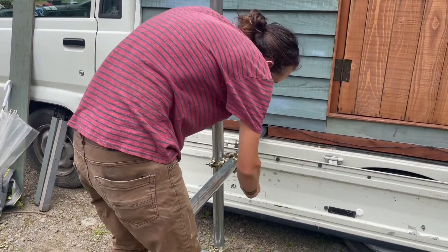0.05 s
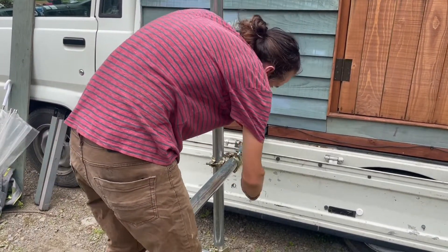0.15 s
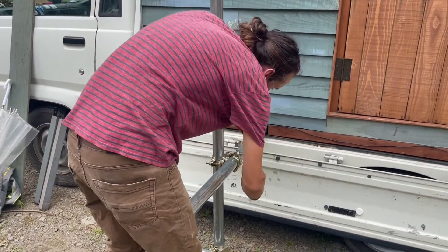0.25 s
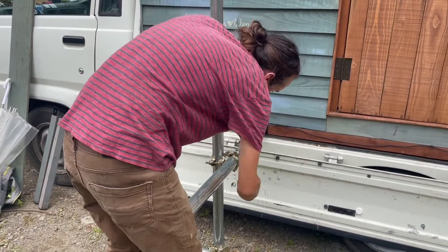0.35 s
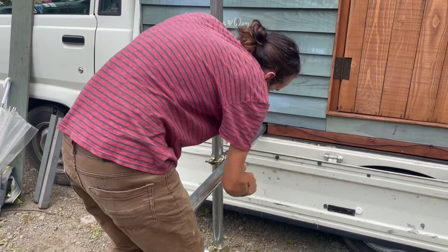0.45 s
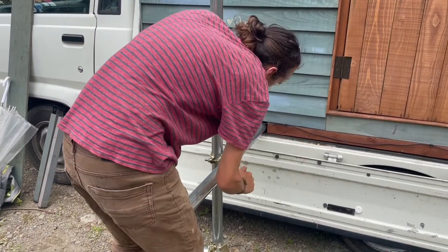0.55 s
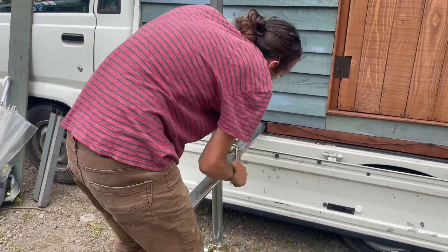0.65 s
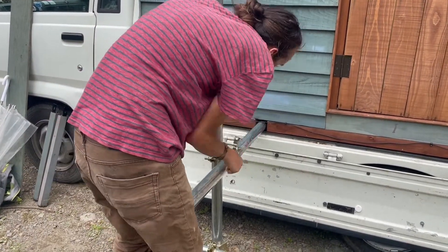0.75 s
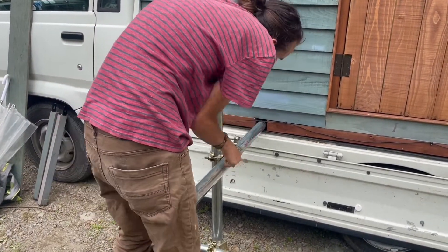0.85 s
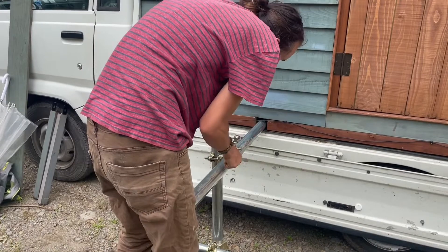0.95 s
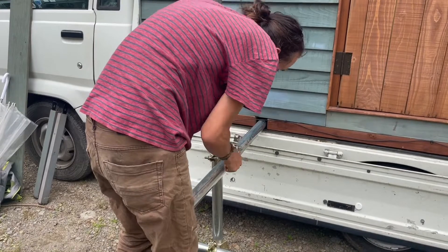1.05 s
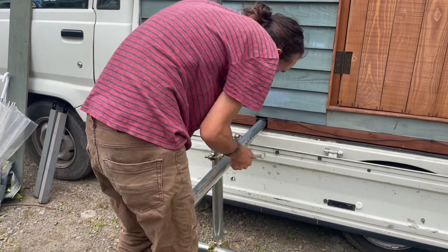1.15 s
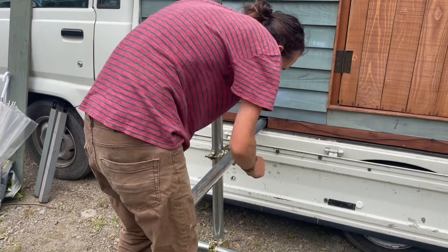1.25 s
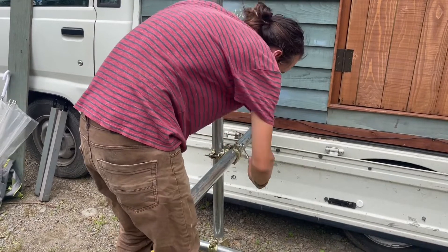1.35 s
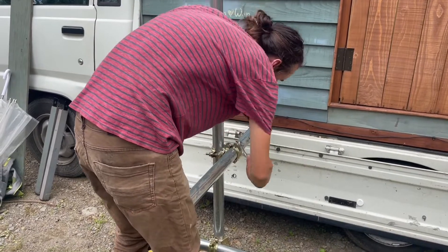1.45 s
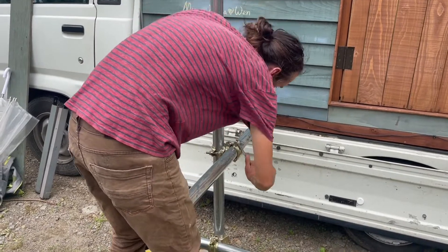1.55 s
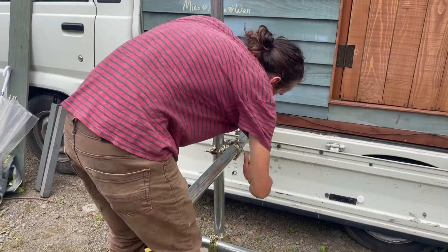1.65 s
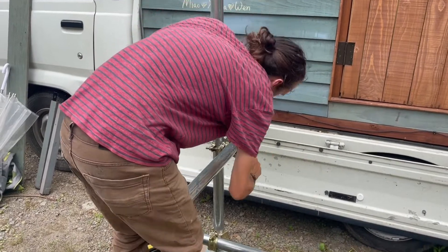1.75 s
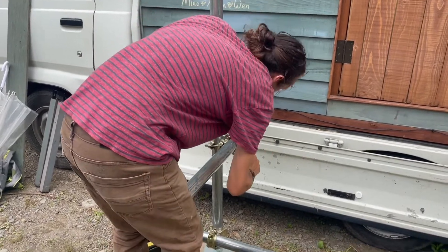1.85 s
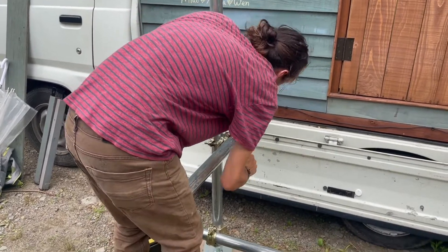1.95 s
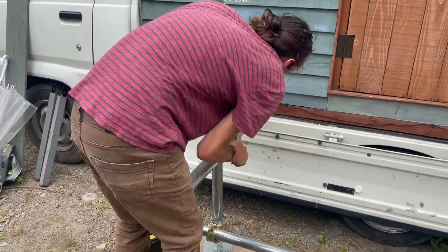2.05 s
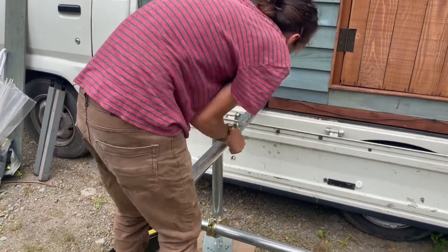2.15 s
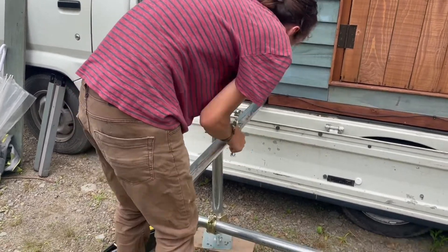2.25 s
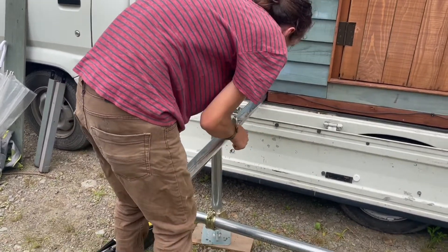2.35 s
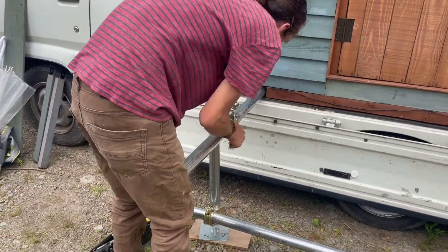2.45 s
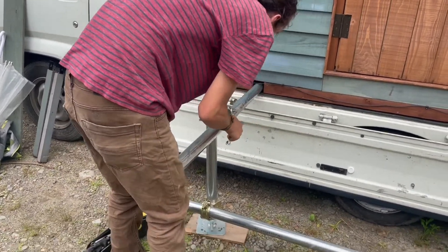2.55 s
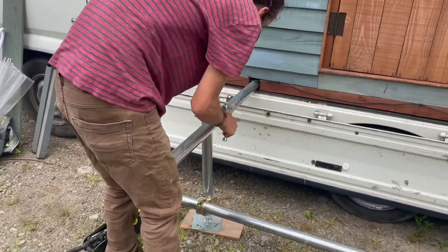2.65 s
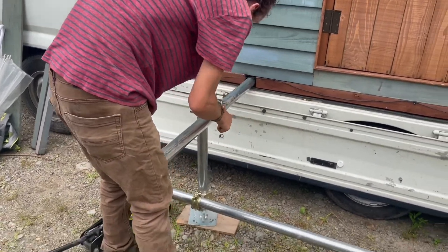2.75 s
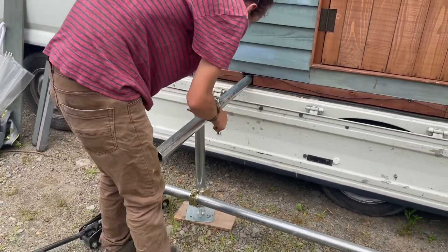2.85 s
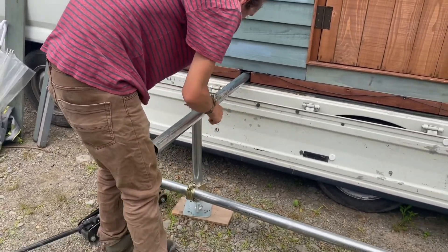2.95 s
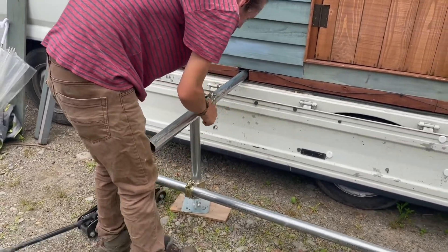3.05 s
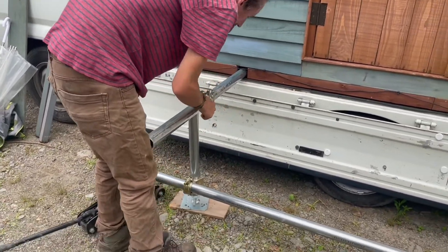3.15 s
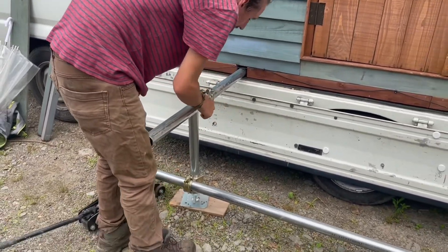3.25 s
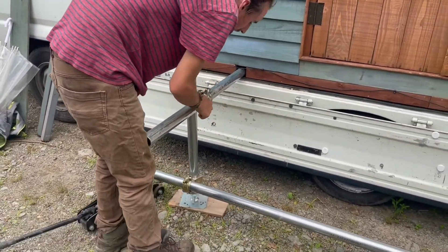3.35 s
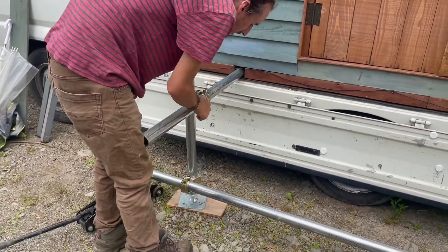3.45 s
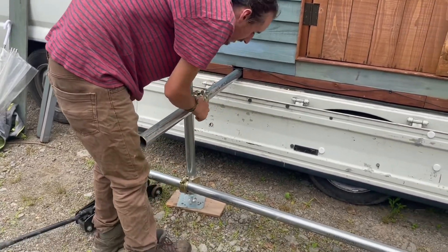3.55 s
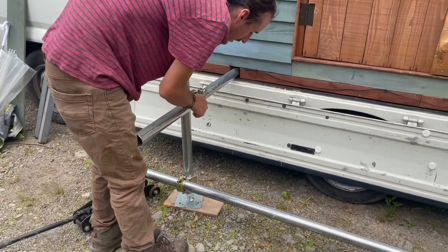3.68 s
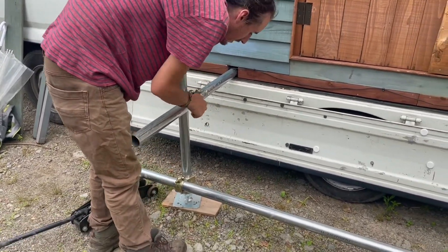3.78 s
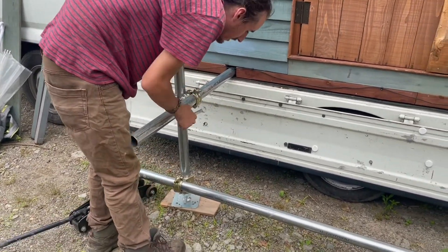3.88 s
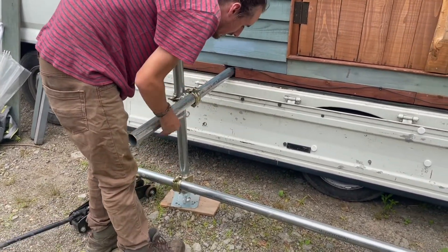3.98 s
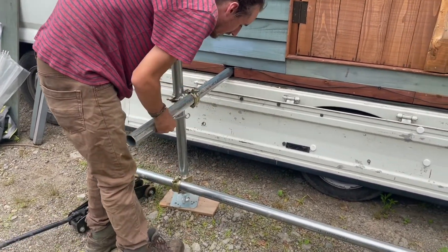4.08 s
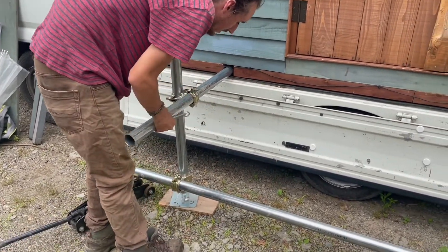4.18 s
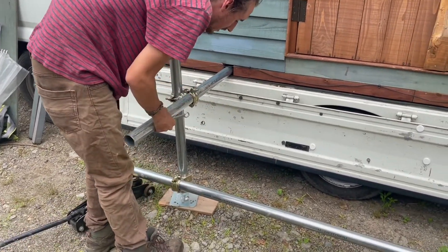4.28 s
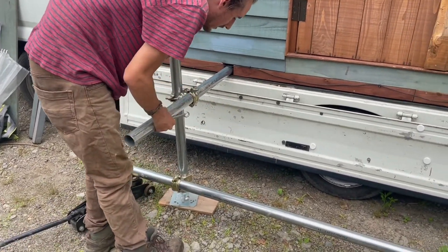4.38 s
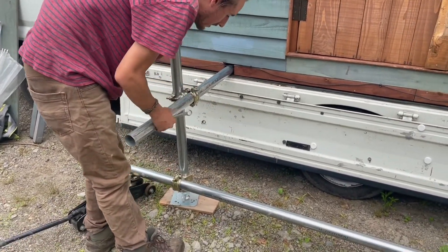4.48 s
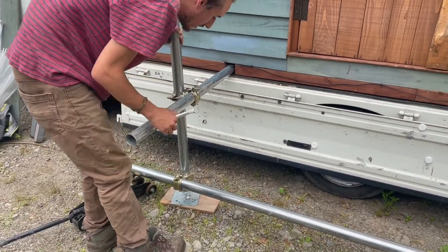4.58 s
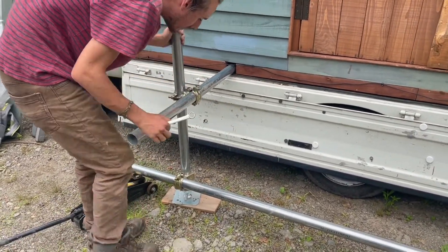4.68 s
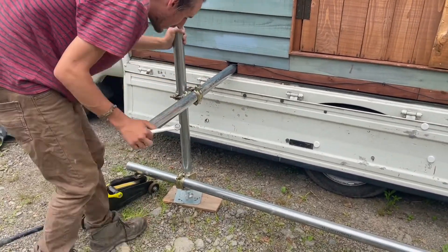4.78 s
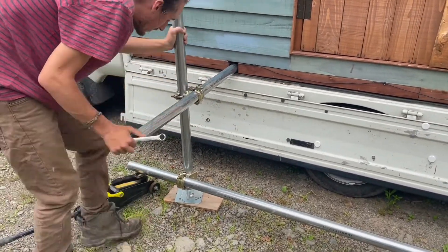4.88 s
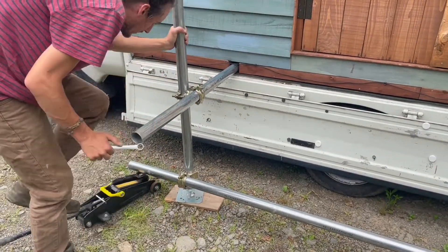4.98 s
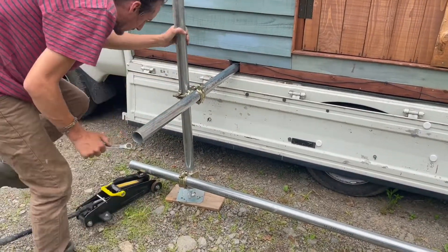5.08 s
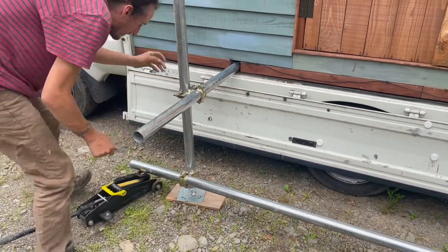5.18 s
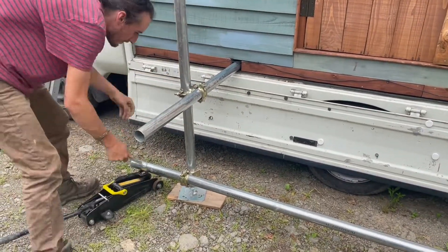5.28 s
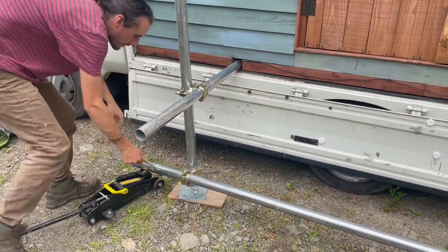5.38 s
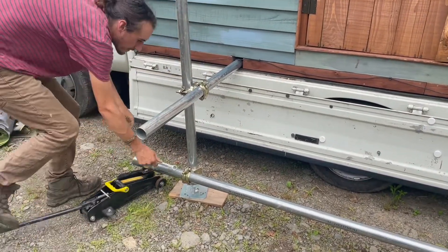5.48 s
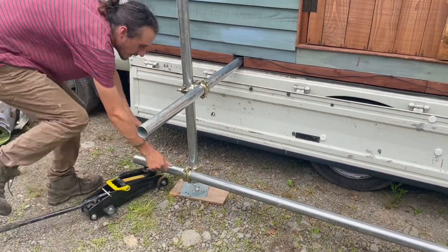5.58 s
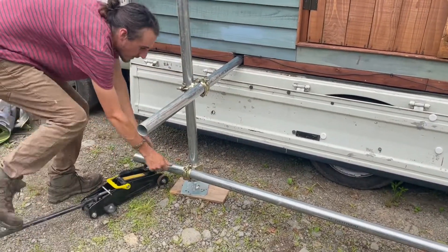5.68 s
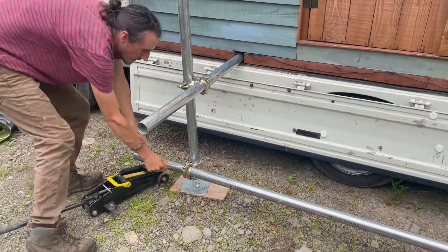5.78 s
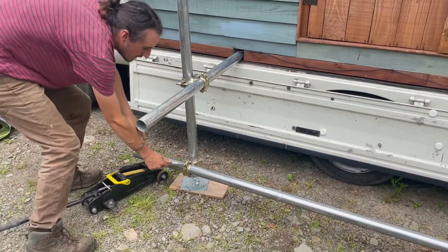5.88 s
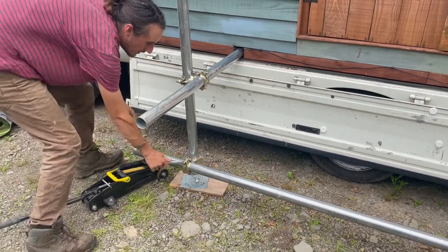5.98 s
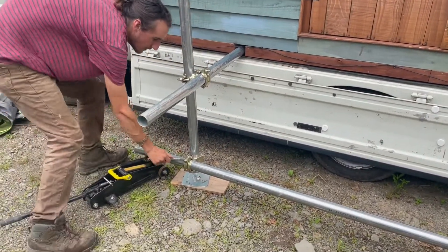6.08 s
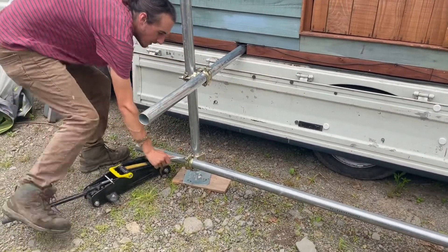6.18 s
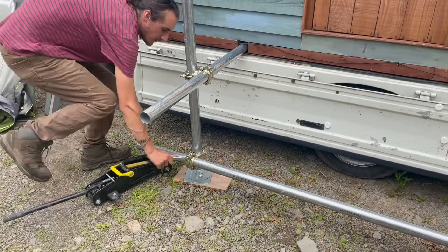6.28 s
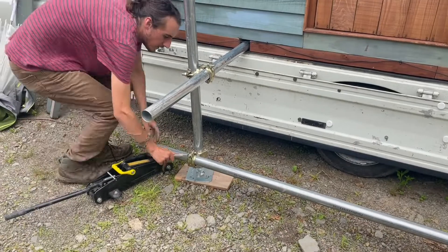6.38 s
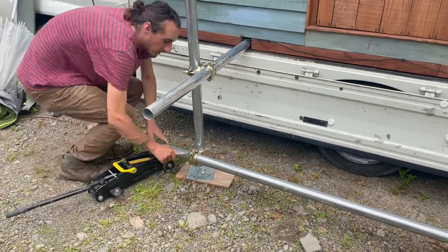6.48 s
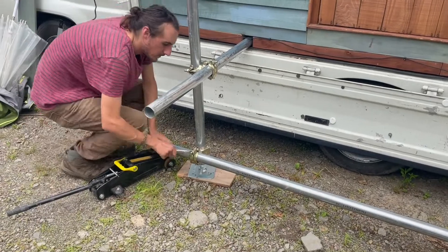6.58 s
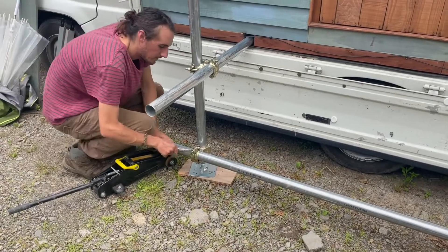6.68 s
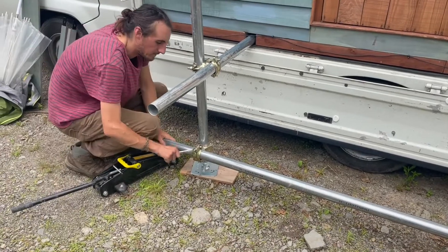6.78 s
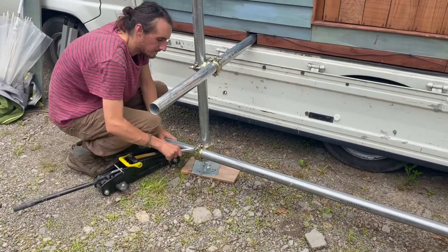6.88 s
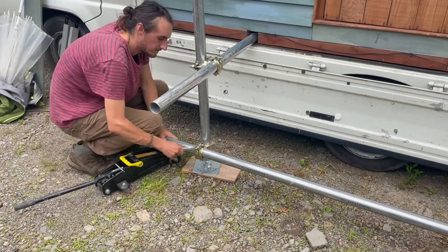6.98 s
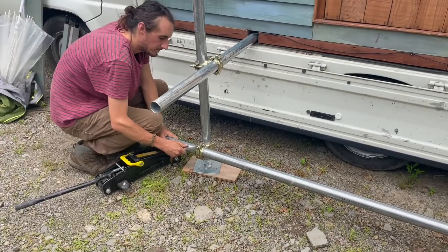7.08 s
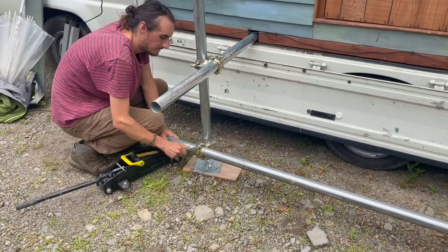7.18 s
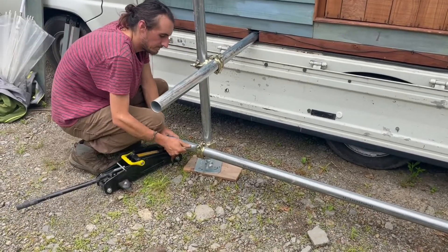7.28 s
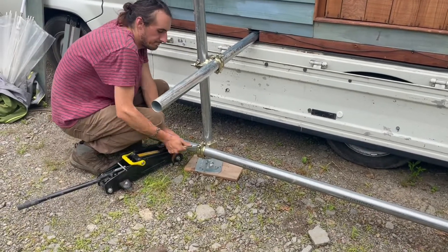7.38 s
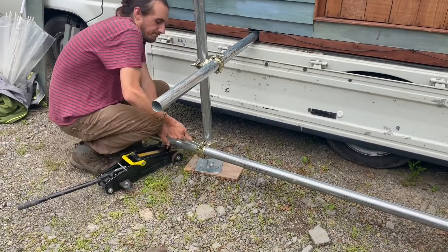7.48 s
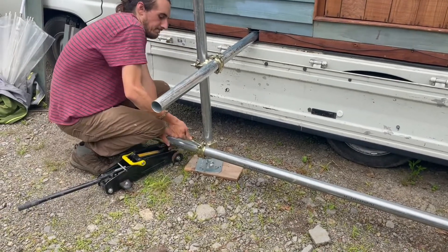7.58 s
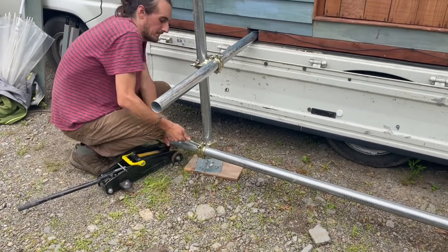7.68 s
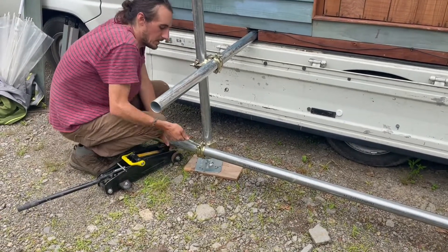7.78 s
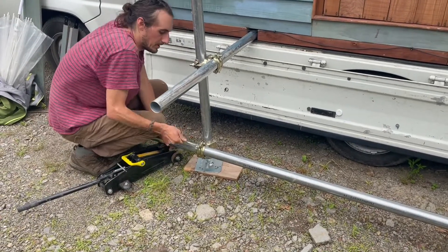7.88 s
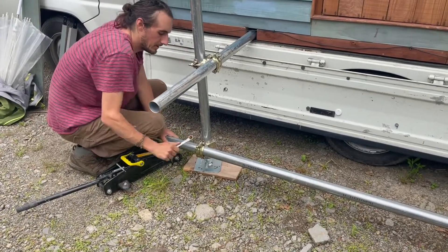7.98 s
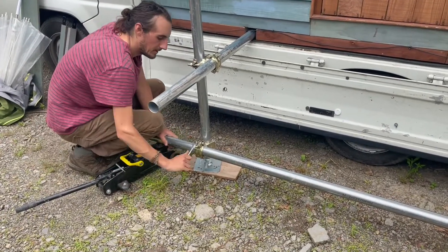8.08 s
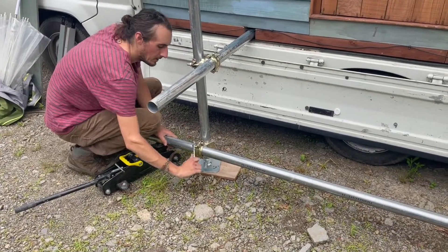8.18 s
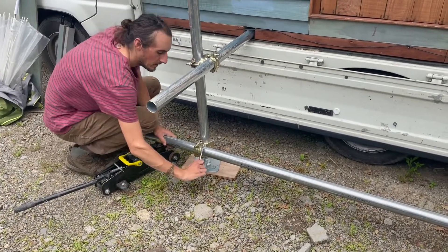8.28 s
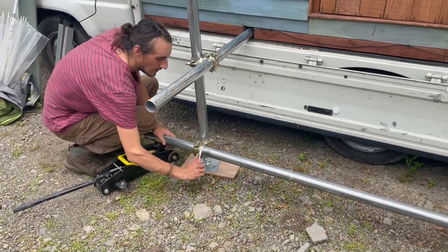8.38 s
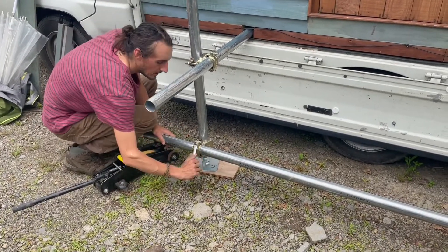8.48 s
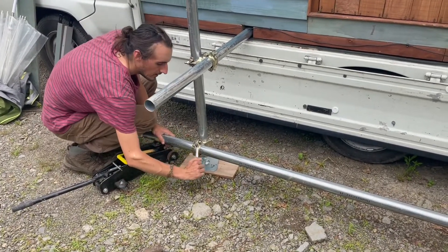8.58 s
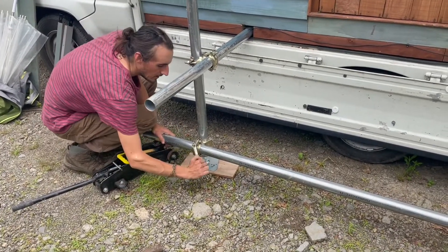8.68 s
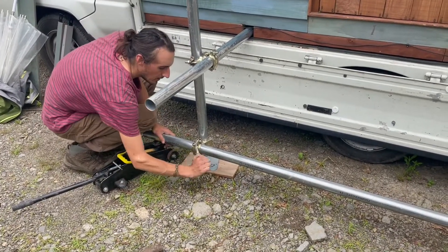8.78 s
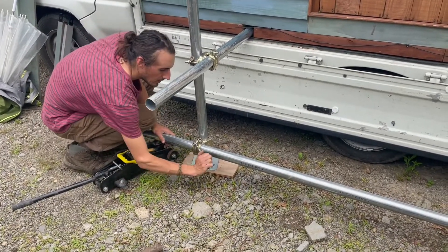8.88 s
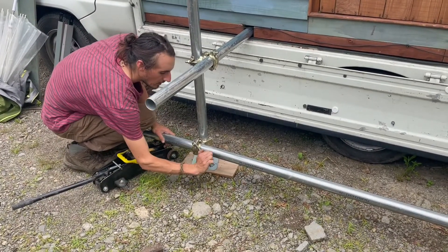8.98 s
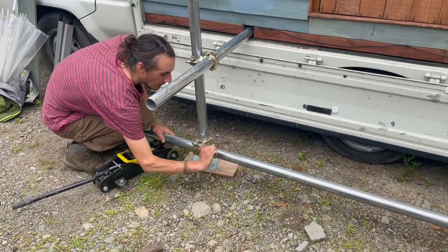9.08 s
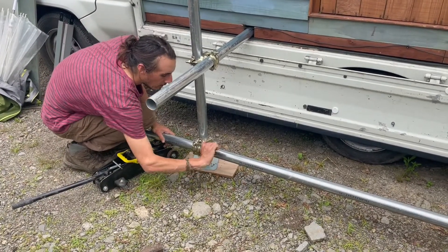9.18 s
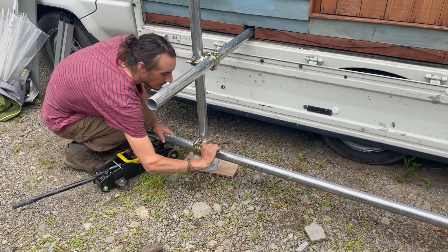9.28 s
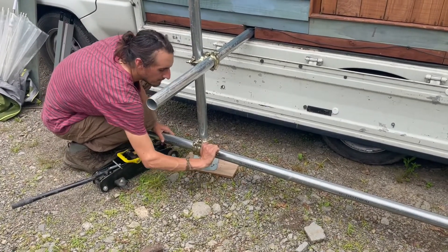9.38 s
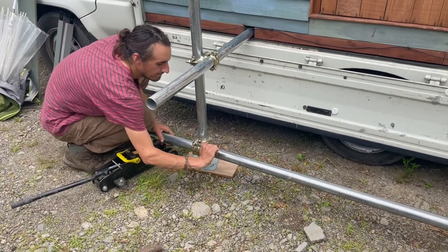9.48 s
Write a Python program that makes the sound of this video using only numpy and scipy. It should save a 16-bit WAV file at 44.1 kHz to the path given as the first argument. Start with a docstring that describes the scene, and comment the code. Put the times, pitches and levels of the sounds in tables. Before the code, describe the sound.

In an open gravel yard, close to a small stereo microphone, a steel spanner works on a scaffold clamp. A light clink comes at 0.2 s, with three thin, falling bird chirps between 0.2 and 0.7 s and a faint distant whistle. Dull taps and a soft rub begin around 0.9 s, then a brighter rattle of clanks at 1.3 to 1.6 s. From 2 to 4.5 s it is quiet: faint ticks, slight sliding, soft low footfalls, cloth rustle, another far whistle near 2.7 s. Gravel crunches from 4.6 s, thickening at 5.2 to 6.1 s with a dragged pipe foot and thuds. A sharp loud clank strikes at 5.5 s, then smaller knocks. A deep thud lands at 6.8 s, a hard click at 7.0. Crisp, ringing knocks cluster from 7.9 to 9.1 s, then fade to quiet air and a faint chirp at 9.5 s.

```python
"""Scaffold clamps and gravel

A man tightens two scaffold clamps with a steel spanner in a gravel yard, a high joint and then a low one.
Knocks and slips are noise bursts through each clamp's resonances; the pipes ring as decaying modes.
Boots and pipe feet crunch, and a pipe foot drags, as trains of tiny impacts over low thuds and rustling cloth.
Far bird calls and whistles, and a faint pipe-like ring, are sine tones with a diffuse echo, over air noise."""
import sys
import numpy as np
from scipy import signal
from scipy.fft import rfft, irfft, next_fast_len
from scipy.io import wavfile

SR = 44100
rng = np.random.default_rng(int(sys.argv[2]) if len(sys.argv) > 2 else 0)


def wav_out(sig):
    """Save sig, one row per channel (or a flat mono array), as 16-bit PCM at SR to the path in sys.argv[1]."""
    wavfile.write(sys.argv[1], SR, np.round(np.clip(np.atleast_2d(sig).T, -1, 1) * 32767).astype(np.int16))


N = 420694

# Spanner contacts on each clamp: start_s, relative level_db, body_db (under about 3 kHz), treble_db, chatter_s
HIGH_BLOWS = [(0.001, -42.5, -6, -1, .005), (0.038, -46, 2, -24, .015), (0.18, -31, -5, 5.5, .014),
              (0.897, -50.5, 16, -4.5, .008), (1.034, -53.5, 15, -9, .007), (1.094, -47, -0.5, -2, .009),
              (1.325, -37, -13, 11.5, .011), (1.408, -28, -16.5, 4, .02), (1.436, -34.5, -1.5, -9, .017),
              (1.518, -38.5, 1.5, -2.5, .009), (1.618, -46.5, -4, 5, .008), (2.234, -49, 6, -8, .005),
              (2.702, -62, 4, -11, 0.0093), (2.884, -59, 5, -21, .009), (3.04, -54.5, 12.5, -22, .005),
              (3.09, -64.5, 4, -24, .01), (3.275, -58, 4.5, 4.5, .021), (5.07, -60.5, -15, 9, .03)]
LOW_BLOWS = [(5.52, -21.5, -13.5, -3, 0.0063), (5.659, -32.5, -6, -14.5, .002),
             (5.717, -41.5, -7, 0, 0.0056), (5.758, -37.5, -1.5, 4.5, 0.0087),
             (5.817, -38.5, 1.5, 2.5, .005), (5.865, -35.5, 2, -0.5, .013), (6.168, -36.5, 0, -6.5, .002),
             (6.225, -35, 7, -6, .015), (6.34, -49.5, 14, -4, 0.014), (6.619, -44, 5, 1, .006),
             (6.771, -37, 7.5, -4.5, .003), (6.965, -28, 4, -0.5, 0.00077), (7.105, -34, 3.5, -1, .003),
             (7.852, -37, -1, -1.5, 0.0033), (7.859, -23, 0, 1, 0.0011), (8.1, -29, -5.5, -4, .001),
             (8.198, -32.5, -1, -4, 0.044), (8.256, -32.5, -10, -7.5, .012), (8.276, -22, -11, 3, .002),
             (8.466, -23.5, 0, -1, .002), (8.612, -35.5, 1, -5, 0.035), (8.702, -43, 6.5, -6.5, .003),
             (8.736, -39, 1, 5, 0.015), (8.759, -38.5, -3.5, 9, .008), (8.8, -41.5, 6.5, -4, .005),
             (8.905, -25, 3, -4.5, 0.0062), (9.082, -40.5, 6.5, -8, .012), (9.113, -35, 6.5, -8, 0.0087)]
# Spectra of the clamps' dense, short-lived resonances: frequency_hz, density_db (per Hz)
HIGH_CLAMP_SPECTRUM = [(150, -5), (330, -1), (480, 0), (1150, -8), (1500, 2), (2400, -3), (2950, 4),
                       (3600, -5), (4200, 4.5), (8300, 1), (9900, -7.5), (11000, 1), (13000, -6),
                       (16000, -27)]
LOW_CLAMP_SPECTRUM = [(300, -8), (1000, -20), (1260, -6), (1650, -9), (2130, -3), (2520, -9), (2900, -1.5),
                      (3450, -7.5), (3950, -3.5), (5300, -1), (7300, -2.5), (10300, -4), (12300, -3),
                      (16000, -19.5)]
# Lasting modes of each joint with its pipes: frequency_hz, relative level_db, t60_s
HIGH_MODES = [(480.6, -13.5, 0.21), (947, -18.5, 0.25), (1452, -16, 0.17), (1830, -30, 0.21),
              (2862, -25.5, 0.92), (3085, -25, 0.29), (3445, -8, 0.1), (3825, -24.5, 1.67),
              (3875, -20.5, 1.1), (3940, -17.5, 0.92), (4210, -21.5, 0.73), (4410, -16, 0.35),
              (5290, -9, 0.13), (4870, -16, 0.24), (6180, -25, 0.11), (6900, -17.5, 0.18),
              (8690, -8, 0.088), (8500, -24, 0.15), (11060, -12.5, 0.23), (11600, -19, 0.13)]
LOW_MODES = [(1254, -23, .2), (2060, -17.5, .12), (2140, -17, 0.082), (2865, -10, .32), (3035, -15, .26),
             (3859, -17, 1.0), (3943, -15, .9), (4038, -18, .85), (4185, -14, .6), (4347, -12.5, .42),
             (4502, -15.5, .35), (4700, -21, .3), (5085, -15, .15), (5439, -13, .18), (6536, -13, .17),
             (6854, -10, .2), (7055, -17, .18), (7316, -13, .15), (7734, -15, .15), (8065, -12, .16),
             (8228, -16, .15), (9216, -17, .15), (10930, -18, .15), (11940, -20, .13)]
# Spanner sliding round the high nut: start_s, length_s, level_db
RUB_EVENTS = [(1.036, 0.25, -54), (2.312, .25, -53), (4.205, 0.11, -59.5)]
# Broad clamp resonances heard in the sliding: frequency_hz, half_width_hz, relative level_db
RUB_BANDS = [(630, 120, 0), (1460, 110, 1), (3150, 300, -1.5), (4320, 200, -4.5)]
# Boots and pipe feet on gravel, with light ticks and scrapes of spanner and nut:
# start_s, relative level_db, bass_db, treble_db, length_s
CRUNCH_EVENTS = [(0.325, -58.5, 0.5, 0, .007), (0.406, -51.5, -13, -5, 0.0065),
                 (0.972, -62, 4.5, -10, .008), (2.043, -51, -7, -1.5, .005), (2.768, -71.5, -26, -23, .003),
                 (2.833, -60.5, -5, -31, 0.014), (2.949, -65, 16, -15, .023), (3.252, -63, 0, -24, .015),
                 (3.6, -67, -12, -9, .002), (3.716, -62.5, -2.5, -17, 0.0058), (4.585, -55, 4, 3, 0.029),
                 (4.764, -44, 2, 2, 0.025), (4.854, -62, 10, -4, 0.016), (5.202, -48.5, 2, 1.5, 0.023),
                 (5.257, -51.5, -2.5, -1, .02), (5.304, -49.5, 2, 4, 0.02), (5.431, -43, 3.5, 4.5, .008),
                 (5.447, -34.5, -6.5, 3, .004), (5.524, -44.5, 9.5, -5, 0.021),
                 (5.596, -40.5, -7.5, 7, 0.0028), (5.773, -39.5, -0.5, 9.5, 0.014),
                 (5.84, -40, -4, 0, 0.041), (5.921, -52.5, 4, 0, 0.023), (5.998, -43, -2.5, 1, 0.017),
                 (6.104, -46, -8.5, 0, .028), (6.368, -41.5, 6.5, -3.5, .008), (6.386, -44, -7, -4, .011),
                 (6.642, -44.5, 1, -8, .02), (6.666, -50.5, 1, -2, .012), (6.734, -48, 0, -10, 0.014),
                 (7.407, -45, -1.5, -3, 0.019), (7.565, -52, 7.5, -12, 0.021),
                 (7.627, -49.5, -18.5, 0.5, 0.016), (7.672, -48.5, -31, -5.5, 0.027),
                 (7.76, -50, -33, 2, .018)]
# Spectrum of snapping stones: frequency_hz, density_db (per Hz)
GRAVEL_SPECTRUM = [(100, -4), (250, -7.5), (450, -0.5), (900, -7), (1700, -2.5), (3000, -6.5),
                   (6000, -11.5), (10000, -18.5), (16000, -28.5)]
# Pipe foot dragged and rattled over gravel: start_s, length_s, relative level_db
DRAG_EVENTS = [(5.54, 0.41, -52.5), (6.02, 0.35, -55.5), (6.6, 0.17, -54.5)]
# Weight landing on the ground: start_s, relative peak_db, pitch_hz, relative scuff_db (dull scuff of the sole)
FOOTFALLS = [(0.943, -50, 84.4, -55.5), (1.849, -57, 170, -68), (2.976, -47, 88, -56.5),
             (3.32, -47.5, 109, -66), (3.97, -61, 152, -62), (4.77, -56, 160, -61),
             (5.202, -45.5, 173, -62), (5.44, -51, 120, -52), (5.547, -40.5, 86, -52),
             (5.798, -50.5, 160, -54), (5.99, -48, 120, -62), (6.369, -44.5, 190, -39),
             (6.825, -36.5, 109.5, -67), (7.421, -53, 167, -52)]
# Spectrum of the sole's scuff: frequency_hz, density_db (per Hz)
SCUFF_SPECTRUM = [(150, -11), (350, 5), (650, 5.5), (1000, -12.5), (2500, -28)]
# Spectrum of the ground's rumble after deep footfalls: frequency_hz, density_db (per Hz)
GROUND_SPECTRUM = [(35, -16), (60, -0.5), (90, 4.5), (140, -5), (350, -12.5), (700, -40)]
# Effort of shifting his weight: time_s, relative level_db of the low rumble
EFFORT = [(0.0, -61), (0.69, -100.5), (0.98, -76), (2.87, -70.5), (3.21, -64.5), (3.8, -70.5),
          (5.45, -65.5), (5.69, -59), (6.11, -58.5), (7.04, -72.5), (7.46, -60), (7.84, -76.5),
          (9.25, -72.5), (9.54, -75.5)]
# Spectra of the low rumble and of the cloth: frequency_hz, density_db (per Hz)
RUMBLE_SPECTRUM = [(30, -32), (55, -6.5), (85, 6.5), (170, 1), (300, -5.5), (600, -9), (1200, -33)]
RUSTLE_SPECTRUM = [(300, -19), (500, 6), (1000, 3.5), (1600, 5.5), (3000, 2.5), (7000, -1), (12000, -9),
                   (16000, -22)]
# A bird's thin call, falling overall: time_s (from its start), pitch_hz, relative level_db
CALL_GLIDE = [(0, 9600, -15), (.006, 9200, -1.5), (.034, 9300, 4), (.045, 10100, -15), (.056, 11100, -5.5),
              (.070, 8900, -1), (.083, 7550, 3), (.094, 7450, 1.5), (.102, 7900, 0), (.116, 6400, -4),
              (.130, 5400, -12)]
# Calls: start_s, relative level_db
CALL_STARTS = [(0.161, -49), (0.392, -46.5), (.621, -49.5), (4.838, -69), (9.50, -57)]
# Far level whistles; the one at 5.067 s is probably a faint ring of the pipe:
# start_s, length_s, pitch_hz, level_db (before the echo)
LEVEL_TONES = [(0.548, 0.44, 3515, -68), (2.64, 0.37, 3514, -61), (5.067, 0.14, 3950, -70)]
# Spectrum of the open air: frequency_hz, density_db (per Hz)
AIR_SPECTRUM = [(24, -37), (40, -34), (130, 4.5), (680, -11.5), (852, -18), (3930, -7.5), (8990, -13),
                (10200, -28.5), (12100, -10), (14500, -37), (16000, -34.5)]
# The two microphone ports: frequency_hz, left_lead_rad, likeness (left-right, 0 to 1)
PORT_PAIR = [(300, 0, .94), (1500, -.2, .7), (2900, -.25, .82), (4200, .75, .85), (6800, 1.1, .87),
             (9000, .8, .8), (10000, -1.2, .7), (12600, -1.6, .78), (13800, -2.9, .96)]
# Treble response of the microphone: frequency_hz, gain_db
MICROPHONE_RESPONSE = [(12500, -1), (14000, 8), (16000, -0.5)]

STEEL_LEFT_DB, CRUNCH_LEFT_DB = 0.92, 1.5  # left gain; the right gets the opposite
BLOW_SIZE, LEVEL_WINDOW = SR // 2, SR // 20  # samples
# harder blows ring relatively less; a chattering spanner damps the pipe
RING_KNEE_DB, RING_SQUEEZE, RING_LOSS_DB_PER_S = -36, 0.12, 200
SETTLE_S, SETTLE_DB = .044, -19.5  # each crunch or tick is followed by a softer one
DULL_MID_SHARE = 0.29  # what a dull crunch loses in the treble, it partly gains around 2 kHz
DEEP_HZ = 100  # footfalls below this pitch leave the ground rumbling
RUSTLE_DB, RUSTLE_FOLLOWS = -72.5, 0.17  # steady cloth at mean effort; its share of the effort's swing in dB
GRIT_PER_S, GRIT_DB = 14, 5  # mean rate of grit ticks; height over the cloth of the weakest


def strokes(blows, bass_db, bass_share, mid_db, mid_share, ring_db):
    """Excitation: a blow's body sets bass and middle together; its force and chatter set the pipe's ring."""
    out = []
    for s, db, body, treble_db, chatter in blows:
        ring = ring_db - RING_SQUEEZE * (db - RING_KNEE_DB) - RING_LOSS_DB_PER_S * chatter
        out.append((s, db, bass_db + bass_share * body, mid_db + mid_share * body, treble_db, chatter, ring))
    return out


def clamp(blows, spectrum, modes, body_t60, tail_db, tail_t60, peak_db, level_db, lowest_hz):
    """Damped resonance: each contact cracks, clanks in the fast-damped clamp and washes through the frame."""
    out, t = np.zeros((2, N)), np.arange(BLOW_SIZE) / SR
    crack = 1.7 * fade(t, .012)
    clank = fade(t, body_t60)
    wash = from_db(tail_db) * fade(t, tail_t60)
    decay = crack + clank + wash
    # the clank gathers around the joint's modes
    grid = np.arange(0, SR / 2, 5)
    resonances = sum(1 / (1 + ((grid - hz) / (12 + hz / 400)) ** 2) for hz, _, _ in modes)
    peaks = rms_one(1 + from_db(peak_db) * resonances)
    for s, db, bass_db, mid_db, treble_db, chatter, _ in blows:
        def shape(hz):
            colour = tilt(hz, bass_db, mid_db, treble_db)
            return colour * np.interp(hz, grid, peaks) * ripple(hz, 45, 4.5)
        envelope = contacts(chatter, per_s=1100, spread_db=-2.5, decay=decay)
        add(out, s, from_db(db + level_db) * envelope * noise(spectrum, BLOW_SIZE, shape))
    return high_pass(out, lowest_hz, order=3)


def pipes(blows, modes, level_db, twin_db):
    """Modal ringing: blows feed each mode unevenly; a tube not quite round splits it into a beating pair."""
    out = np.zeros((2, N))
    s, db, bass_db, mid_db, treble_db, chatter, ring_db = np.transpose(blows)
    for hz, mode_db, t60 in modes:
        colour = np.array([tilt(hz, *contact) for contact in zip(bass_db, mid_db, treble_db)])
        split_hz = rng.choice([-1, 1]) * rng.uniform(3, 8)
        unsteady = waver(28, 2.2)
        for pitch, share_db in [(hz, 0), (hz + split_hz, twin_db)]:
            chance = rng.standard_normal((len(s), 4))
            strength_db = db + ring_db + mode_db + share_db + level_db + 2 * chance[:, 0]
            strength = from_db(strength_db) * colour
            # start amid the chatter, with a random delay that varies the phase
            start_s = s + np.abs(chatter) / 2 + np.abs(chance[:, 1]) / hz
            at = np.clip(start_s * SR, 0, N - 1).astype(int)
            clicks = np.full((2, N), 1e-18)
            clicks[:, at] = strength * from_db(chance[:, 2:].T)
            r, w = fade(1 / SR, t60), 2 * np.pi * pitch / SR
            # zeros at both ends of the range keep the ring close to its own pitch
            out += unsteady * signal.lfilter([.5, 0, -.5], [1, -2 * r * np.cos(w), r * r], clicks)
    return out


def rubs(between_db):
    """Sliding friction: steel on steel swells and fades in a few broad resonances of the clamp."""
    out = np.zeros((2, N))

    def shape(hz):
        peaks = sum(from_db(db) / (1 + ((hz - centre) / width) ** 2) for centre, width, db in RUB_BANDS)
        return from_db(between_db) + peaks

    for s, length, db in RUB_EVENTS:
        size = int(length * SR)
        slide = rms_one(noise(HIGH_CLAMP_SPECTRUM, size, shape))
        add(out, s, from_db(db) * signal.windows.hann(size) * slide)
    return out


def crunches_and_ticks(tail_t60, level_db):
    """Granular impact: boots and pipe feet crunch gravel, spanner and nut tick; each has a short dry ring."""
    out, t = np.zeros((2, N)), np.arange(BLOW_SIZE) / SR
    decay = fade(t, .015) + from_db(-19) * fade(t, tail_t60)
    for s, db, bass_db, treble_db, length in CRUNCH_EVENTS:
        def shape(hz):
            return tilt(hz, bass_db, -DULL_MID_SHARE * treble_db, treble_db) * ripple(hz, 220, 4.5)
        for delay, slip_db in [(0, 0), (SETTLE_S, SETTLE_DB)]:
            impacts = contacts(length, per_s=900, spread_db=16, decay=decay, first=.35)
            burst = impacts * noise(GRAVEL_SPECTRUM, BLOW_SIZE, shape)
            add(out, s + delay, from_db(db + slip_db + level_db) * burst)
    return high_pass(out, hz=90)


def pipe_foot_drag(snaps_per_s, spread_db, t60):
    """Granular shear: under a dragged pipe foot, stones snap at random and with very uneven strength."""
    out = np.zeros((2, N))
    for s, length, db in DRAG_EVENTS:
        size = int(length * SR)
        chance, strength = rng.random((2, SR))[:, :size]
        snaps = (chance < snaps_per_s / SR) * from_db(-spread_db * strength)
        snaps = snaps * signal.windows.tukey(size, .3)
        envelope = signal.lfilter([1], [1, -fade(1 / SR, t60)], snaps + 1e-18)
        add(out, s, from_db(db) * rms_one(envelope) * noise(GRAVEL_SPECTRUM, SR)[:, :size])
    return high_pass(out, hz=250)


def thuds(t60, rise_s, level_db):
    """Damped oscillation: the ground answers a footfall with a few low cycles."""
    out, t = np.zeros(N), np.arange(BLOW_SIZE) / SR
    shape = (1 - fade(t, rise_s)) * fade(t, t60)
    for s, db, hz, _ in FOOTFALLS:
        add(out, s, from_db(db + level_db) * shape / shape.max() * np.sin(2 * np.pi * hz * t))
    return out


def scuffs(level_db, rise_s, t60):
    """Friction noise: a sole grinds briefly into the packed earth as it lands."""
    out, t = np.zeros((2, N)), np.arange(BLOW_SIZE) / SR
    shape = (1 - fade(t, rise_s)) * fade(t, t60)
    for s, _, _, db in FOOTFALLS:
        add(out, s, from_db(db + level_db) * shape / shape.max() * noise(SCUFF_SPECTRUM, BLOW_SIZE))
    return out


def ground_rumble():
    """Slow low-frequency decay: the deepest footfalls die away slowly in the ground."""
    deep = [footfall for footfall in FOOTFALLS if footfall[2] < DEEP_HZ]
    envelope = swells(deep, level_db=-54.5, follows=.8, rise_s=.02, t60=0.88)
    return envelope * noise(GROUND_SPECTRUM, N)


def movement(rumble_db):
    """Modulated noise: shifting weight rumbles; cloth rustles with steps and pulls, and loose grit ticks."""
    s, db = np.transpose(EFFORT)
    effort_db = np.interp(np.arange(N) / SR, s, db)
    low = from_db(effort_db + rumble_db)
    cloth = from_db(RUSTLE_DB + RUSTLE_FOLLOWS * (effort_db - effort_db.mean()))
    cloth = cloth + swells(CRUNCH_EVENTS, level_db=-69, follows=1.0, rise_s=0.033, t60=0.17)
    cloth += swells(HIGH_BLOWS + LOW_BLOWS, level_db=-60.5, follows=0.26, rise_s=0.027, t60=0.17)
    # tick strengths are random, up to 10 dB apart
    tick_db = 4 * np.minimum(rng.exponential(1, N), 2.5)
    ticks = (rng.random(N) < GRIT_PER_S / SR) * from_db(tick_db)
    grit = from_db(GRIT_DB) * signal.lfilter([1], [1, -fade(1 / SR, .012)], ticks + 1e-18)
    unsteady = waver(per_s=14, depth_db=5)
    rumble = low * noise(RUMBLE_SPECTRUM, N)
    return unsteady * (rumble + cloth * noise(RUSTLE_SPECTRUM, N) * (1 + grit))


def distant_tones(echo_db, echo_t60):
    """Diffuse scattering: bird calls and level tones, smeared by surrounding trees and walls."""
    out = np.zeros(N)
    s, hz, db = np.transpose(CALL_GLIDE)
    t = np.arange(int(s[-1] * SR)) / SR
    for start, level_db in CALL_STARTS:
        # each call is slightly sharp or flat
        pitch = np.interp(t, s, hz) * (1 + 0.0047 * rng.standard_normal())
        phase = 2 * np.pi * np.cumsum(pitch) / SR
        add(out, start, from_db(level_db + np.interp(t, s, db)) * np.sin(phase))
    for start, length, pitch, level_db in LEVEL_TONES:
        t = np.arange(int(length * SR)) / SR
        tone = np.sqrt(2) * np.sin(2 * np.pi * pitch * t)
        add(out, start, from_db(level_db) * signal.windows.tukey(len(t), .5) * tone)
    scatter = rng.standard_normal((2, BLOW_SIZE)) * fade(np.arange(BLOW_SIZE) / SR, echo_t60)
    scatter /= np.sqrt(np.sum(scatter ** 2) / 2)
    return out + from_db(echo_db) * signal.fftconvolve(out[None], scatter, axes=1)[:, :N]


def air(level_db):
    """Stationary coloured noise: the steady bed of the open air."""
    return from_db(level_db) * noise(AIR_SPECTRUM, N)


def contacts(length, per_s, spread_db, decay, first=1):
    """Impact train: the power of uneven micro-impacts adds up, each dying by decay."""
    i = np.arange(int(np.clip(length, .0005, .2) * SR))
    chance, strength = rng.random((2, BLOW_SIZE))[:, i]
    clicks = (chance < per_s / SR) * from_db(-spread_db * strength)
    clicks[0] = first
    # a short blow starts hard; a scrape longer than 20 ms swells
    clicks *= np.minimum((i + 1) / (max(length - .02, 0) * SR + 1), 1)
    power = np.abs(signal.fftconvolve(clicks ** 2, decay ** 2)[:BLOW_SIZE])
    # steel and stone need a fraction of a millisecond to make full contact
    power *= np.minimum(np.arange(BLOW_SIZE) / (.0006 * SR), 1) ** 2
    return np.sqrt(power * LEVEL_WINDOW / power.sum())


def swells(events, level_db, follows, rise_s, t60):
    """Power summation: an envelope rises quickly at each event and dies, higher for stronger events."""
    out, t = np.zeros(N), np.arange(2 * BLOW_SIZE) / SR
    shape = np.minimum(t / rise_s, 1) * fade(np.maximum(t - rise_s, 0), t60)
    mean_db = np.mean([db for _, db, *_ in events])
    for s, db, *_ in events:
        add(out, s, (from_db(level_db + follows * (db - mean_db)) * shape) ** 2)
    return np.sqrt(out)


def noise(spectrum, size, shape=lambda hz: 1):
    """Partial coherence: coloured stereo noise, normalised before shape, partly alike in both ports."""
    length = next_fast_len(size)
    hz = np.fft.rfftfreq(length, 1 / SR)
    alike = at_hz(PORT_PAIR, hz, axis=2)
    mid, side = rfft(rng.standard_normal((2, length)))
    low_cut = np.minimum(hz / spectrum[0][0], 1) ** 2
    gain = rms_one(from_db(at_hz(spectrum, hz)) * low_cut) * shape(hz)
    common = np.sqrt((1 + alike) / 2) * mid
    opposed = np.sqrt((1 - alike) / 2) * side * [[1], [-1]]
    return irfft(gain * (common + opposed), length)[:, :size]


def tilt(hz, bass_db, mid_db, treble_db):
    """Contact colour: each point of contact stresses other parts of the range."""
    points = [(1200, bass_db), (1900, mid_db), (3250, mid_db), (3750, 0), (7000, 0), (8500, treble_db)]
    return from_db(at_hz(points, hz))


def ripple(hz, spacing_hz, depth_db):
    """Modal density: the crowd of small resonances that one contact happens to wake."""
    draws = rng.standard_normal(600)
    heights = np.interp(hz / spacing_hz, np.arange(len(draws)), np.clip(draws, -2, 2))
    return rms_one(from_db(depth_db * heights))


def waver(per_s, depth_db):
    """Amplitude modulation: a slow random gain, the same at both ports."""
    steps = from_db(depth_db * rng.standard_normal(int(per_s * N / SR) + 2))
    return np.interp(np.arange(N) * per_s / SR, np.arange(len(steps)), steps)


def high_pass(x, hz, order=2):
    """Radiation efficiency: small things radiate no deep bass."""
    return signal.sosfilt(signal.butter(order, hz, "high", fs=SR, output="sos"), x)


def fade(t, t60):
    """Exponential decay: 60 dB down after t60."""
    return np.exp(-np.log(1000) * t / max(t60, 1e-4))


def from_db(db):
    """Logarithmic level: decibels to amplitude gain."""
    return 10 ** (np.asarray(db) / 20)


def rms_one(x):
    """Normalisation: scale to rms 1."""
    return x / np.sqrt(np.mean(x ** 2) + 1e-20)


def at_hz(points, hz, axis=1):
    """Interpolation: read a table column on a log-frequency axis."""
    points = np.array(points)
    return np.interp(np.log(hz + 1), np.log(points[:, 0]), points[:, axis])


def add(out, s, x):
    """Superposition: mix x into out from time s."""
    i = max(round(s * SR), 0)
    out[..., i:i + x.shape[-1]] += x[..., :max(N - i, 0)]


def scene():
    """Superposition of both joints, the gravel, the man's movement and the open air."""
    upper = strokes(HIGH_BLOWS, bass_db=-2.5, bass_share=1.04, mid_db=3.5, mid_share=0.51, ring_db=0.5)
    lower = strokes(LOW_BLOWS, bass_db=-1.5, bass_share=0.91, mid_db=-1.5, mid_share=1.03, ring_db=4.5)
    high = clamp(upper, HIGH_CLAMP_SPECTRUM, HIGH_MODES, body_t60=0.13, tail_db=-13.0, tail_t60=0.26,
                 peak_db=-2, level_db=-1.5, lowest_hz=310)
    high += pipes(upper, HIGH_MODES, level_db=-3.5, twin_db=6)
    high += rubs(between_db=-18)
    low = clamp(lower, LOW_CLAMP_SPECTRUM, LOW_MODES, body_t60=0.11, tail_db=-8.5, tail_t60=0.23,
                peak_db=13.5, level_db=-3.0, lowest_hz=480)
    low += pipes(lower, LOW_MODES, level_db=-5, twin_db=-6.0)
    steel = (high + low) * from_db([[STEEL_LEFT_DB], [-STEEL_LEFT_DB]])
    crunches = crunches_and_ticks(tail_t60=0.32, level_db=0.0)
    crunches = crunches * from_db([[CRUNCH_LEFT_DB], [-CRUNCH_LEFT_DB]])
    drag = pipe_foot_drag(snaps_per_s=130, spread_db=19, t60=.025)
    ground = thuds(t60=0.077, rise_s=0.055, level_db=-0.5) + ground_rumble()
    ground += scuffs(level_db=3, rise_s=0.025, t60=0.097)
    background = distant_tones(echo_db=-2.0, echo_t60=0.48) + air(level_db=-70)
    return steel + crunches + drag + ground + movement(rumble_db=2.5) + background


def record(dry):
    """Phase difference: two ports hear the treble out of step, lifted near 14 kHz and cut above 15.8 kHz."""
    length = next_fast_len(N + SR // 10)
    hz = np.fft.rfftfreq(length, 1 / SR)
    lead = np.exp(.5j * at_hz(PORT_PAIR, hz) * [[1], [-1]])
    response = from_db(at_hz(MICROPHONE_RESPONSE, hz)) * lead
    ported = irfft(rfft(dry, length) * response, length)[:, :N]
    top_cut = signal.ellip(10, .1, 70, 15800, fs=SR, output="sos")
    return signal.sosfilt(top_cut, high_pass(ported, hz=40.3))


dry = scene()
out = record(dry)
wav_out(out)
```